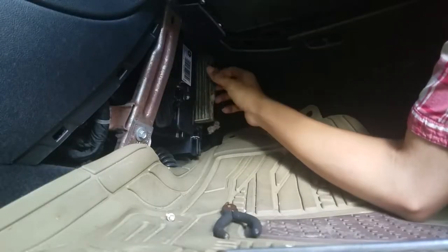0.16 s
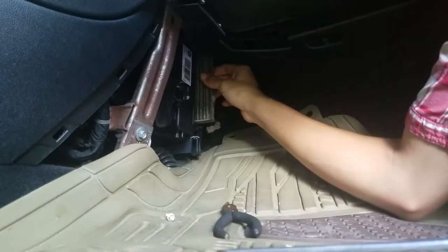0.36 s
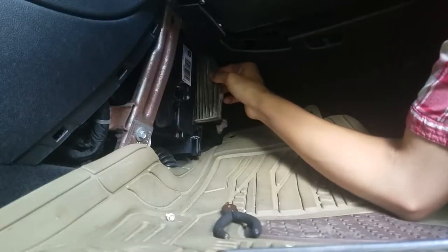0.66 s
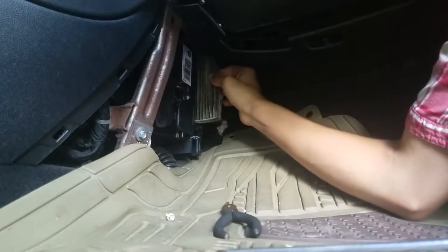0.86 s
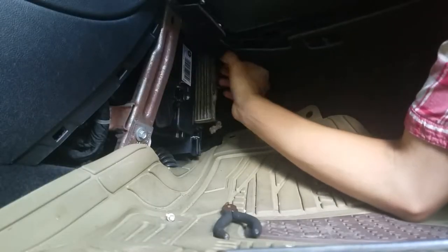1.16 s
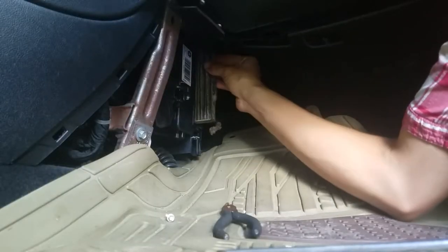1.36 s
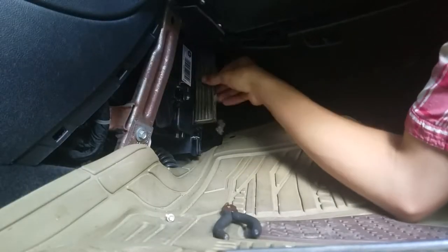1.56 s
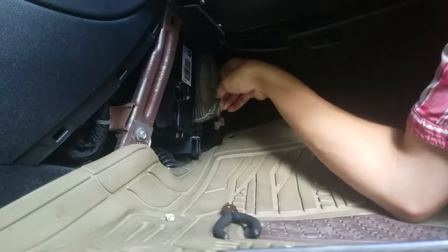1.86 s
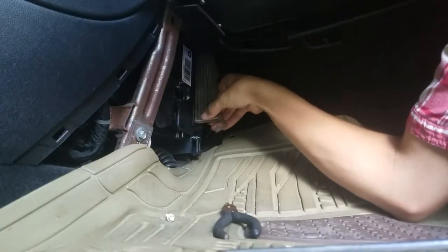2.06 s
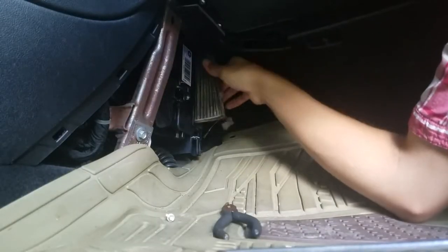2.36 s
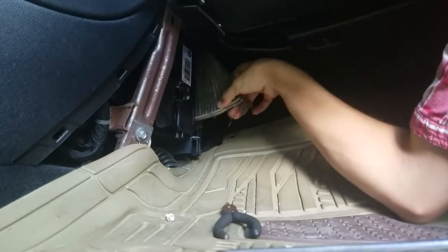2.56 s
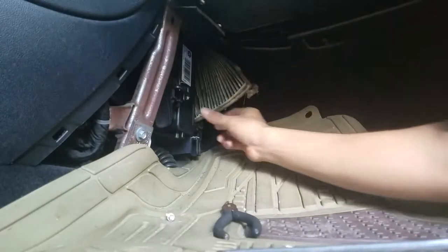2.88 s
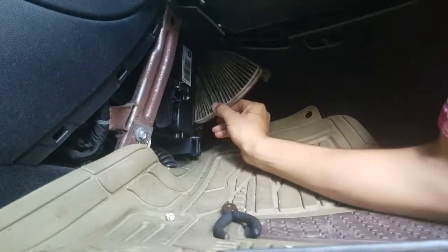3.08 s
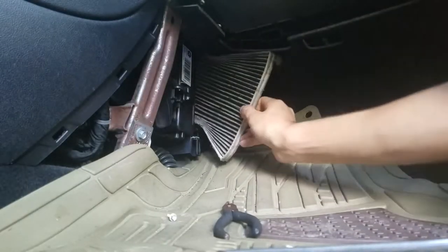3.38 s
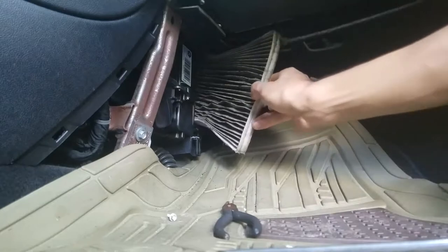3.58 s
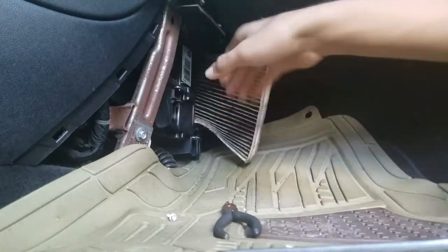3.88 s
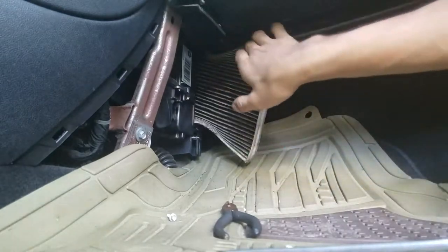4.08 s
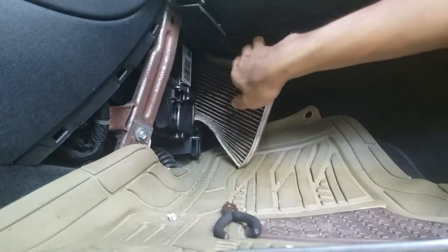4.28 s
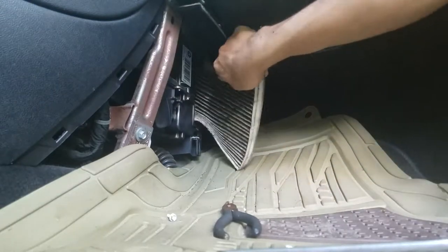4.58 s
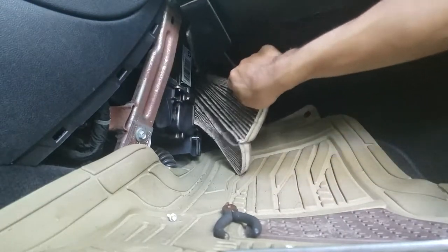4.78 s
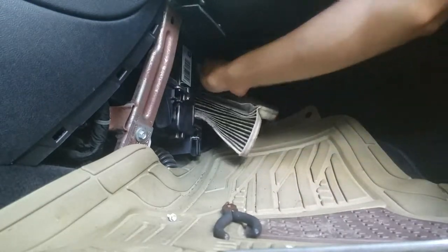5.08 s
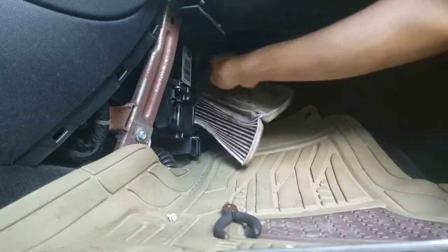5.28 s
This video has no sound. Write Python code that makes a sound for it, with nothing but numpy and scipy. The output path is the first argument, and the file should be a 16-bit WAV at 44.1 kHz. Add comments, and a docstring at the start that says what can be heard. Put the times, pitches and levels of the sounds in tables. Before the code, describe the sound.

A hand works a pleated paper filter out of a plastic slot, with soft knocks, dry crackling snaps and short scrapes, then folding crinkles.

```python
"""Low rumble first, giving way after about a second to a faint hiss; over it a hand works a pleated paper
air filter out of its plastic housing in the footwell of a parked car. Bumps are decaying low sines; snaps are
jerks and fibre slips, scrapes trains of stick-slip catches, both coloured by paper, frame and housing rings.
Faint rubbing, one finger slide and one nail tick fill in; the carpeted footwell adds a very short echo."""
import sys
import numpy as np
from scipy import signal
from scipy.fft import rfft, irfft, next_fast_len
from scipy.io import wavfile

SR = 44100
rng = np.random.default_rng(int(sys.argv[2]) if len(sys.argv) > 2 else 0)


def generate_wav(sig):
    """Save sig (samples, or channels by samples) to the path in sys.argv[1] as 16-bit PCM at SR."""
    pcm = np.round(np.clip(np.atleast_2d(sig).T, -1, 1) * 32767).astype(np.int16)
    wavfile.write(sys.argv[1], SR, pcm)


N = 239842  # samples

# Event levels are before each source's level_db trim, the footwell and the microphones.
# pleat snaps: t/s, level of pleat ring/dB, frame re pleat/dB, crispness/dB
SNAPS = [(0.3445, -61.5, 5.5, 4.5), (0.5791, -51.5, -4, -18), (0.5926, -51.5, -4, -22),
         (0.7546, -49.5, -1, -12), (0.9432, -60, 3, -6), (1.124, -45.5, -16, -9), (1.3318, -35, -16, -8.5),
         (1.516, -46, 7.5, -9.5), (1.7348, -46.5, -10, -3), (1.7437, -43, -6, -11), (1.754, -47, -15, -8),
         (1.9923, -40.5, -7.5, -14.5), (2.0666, -47, -5, 0.5), (2.1826, -39.5, -9.5, -6),
         (2.2055, -42, -2, -13), (2.2722, -36.5, -16, -14), (2.2812, -40, -18, -16),
         (2.2875, -42.5, 1, -7.5), (2.3606, -28, -9.5, -13), (2.3739, -43.5, 7, -3),
         (2.3853, -36, -2.5, -19), (2.5023, -50.5, -3.5, -7.5), (2.6347, -36.5, -7, -13),
         (2.6392, -33, -19, -13), (2.7643, -43.5, -8, -32), (2.8998, -35.5, -2, -24),
         (2.9087, -51.5, 9, -31), (3.074, -43.5, -12, -1), (3.0838, -34.5, 2.5, -10), (3.0946, -34, -1, -5),
         (3.164, -39, -5, -22), (3.1718, -35.5, -5.5, -18.5), (3.2123, -23.5, -4.5, 0),
         (3.2191, -32, -11, -5), (3.2232, -25, -10, -17), (3.3238, -50, 4, 0), (3.4033, -44.5, -5, -2),
         (3.4122, -44.5, 3, -18), (3.473, -35.5, -9.5, -20), (3.529, -40, -12, -21), (3.5397, -44, 1, -15),
         (3.597, -42, -5, -16), (3.605, -39.5, -3, -3.5), (3.6176, -36.5, -0.5, 2.5), (3.6204, -30, 0, -28),
         (3.6738, -39.5, -7, -6.5), (3.6972, -48.5, -2.5, -3), (3.7997, -41.5, -13, -5.5),
         (3.8753, -49.5, -4, -10), (3.9829, -45.5, -12, -7), (4.0441, -52.5, -12, -11),
         (4.3084, -41.5, -17, -6), (4.3622, -47.5, -9.5, -14), (4.4423, -49, 1, -8.5),
         (4.5393, -55.5, 2, -1), (4.6682, -48, -1.5, -11), (4.7279, -53.5, 4.5, -17),
         (4.7485, -46, 1, -2.5), (4.7694, -47, -2, -3), (4.8185, -42.5, -3.5, -1.5),
         (4.8464, -44.5, -12, -6.5), (4.9372, -42.5, -4.5, -8), (4.9885, -44.5, -1.5, -2),
         (5.0907, -43, -7, -13), (5.127, -46.5, -0.5, -4), (5.1539, -44.5, -24, -14),
         (5.1703, -48, -1, -25), (5.19, -46, 0.5, 3.5), (5.1998, -49, 8.5, 1), (5.2643, -57, -2, -5),
         (5.4088, -51, 4, -15), (5.4236, -52, 2.5, -10)]
# paper dragging over plastic: start/s, end/s, crest level/dB, crest re ends/dB, crispness/dB
SCRAPES = [(0.057, 0.093, -82, 6, 14.5), (0.338, 0.382, -69, -7, -20), (0.414, 0.464, -73, -6, -9),
           (0.533, 0.625, -68.5, 0.5, -5), (0.735, 0.771, -66.5, 4, -2.5), (1.025, 1.073, -72.5, 2, -2),
           (1.118, 1.189, -60, 11, -7), (1.25, 1.311, -63.5, 3.5, -7), (1.505, 1.573, -63.5, 0, -2.5),
           (1.711, 1.788, -63.5, 3, -5), (2.105, 2.158, -65, 0, -2.5), (2.173, 2.189, -53, 11, -10),
           (2.188, 2.238, -53, 10, -5), (2.23, 2.28, -63.5, 2, 2), (2.266, 2.296, -47, 13, -10),
           (2.351, 2.397, -50, 2, -5), (2.526, 2.61, -65.5, -2, -3.5), (2.606, 2.663, -42.5, 18.5, -7.5),
           (2.713, 2.842, -53.5, 19, -8), (2.96, 2.968, -52, 5, -7.5), (3.044, 3.117, -35, 22, -11.5),
           (3.175, 3.246, -39, 14.5, -7.5), (3.245, 3.283, -58, -2, -8), (3.315, 3.362, -55, 6, -11),
           (3.397, 3.442, -44.5, -2.5, -13), (3.451, 3.493, -52.5, 7, -6.5), (3.498, 3.555, -44, 3, -9),
           (3.546, 3.589, -54.5, -3.5, -6), (3.593, 3.647, -49, 6, -8), (3.67, 3.751, -57.5, 2, -4.5),
           (3.771, 3.899, -61.5, 3.5, -4.5), (4.008, 4.052, -65, 3.5, -1), (4.136, 4.16, -65, 4, -2.5),
           (4.41, 4.458, -64, 6, -24), (4.648, 4.695, -53.5, 8.5, -9), (4.708, 4.792, -53, 4, -13),
           (4.827, 4.885, -56.5, 11, -4), (4.888, 4.912, -57.5, 1.5, -8.5), (4.918, 5.005, -60, -4, -8.5),
           (5.017, 5.094, -58.5, 4.5, -5), (5.134, 5.217, -50, 7.5, -6.5), (5.254, 5.331, -64, -8.5, -2),
           (5.404, 5.438, -58, 12, -7.5)]
# fingers and frame bumping the housing: t/s, level/dB, f/Hz
KNOCKS = [(0.344, -40, 507), (0.345, -43.5, 296), (0.361, -47, 217), (0.379, -38, 480), (0.434, -39, 450),
          (0.445, -40.5, 480), (0.466, -46.5, 139), (0.554, -40, 312), (0.561, -40, 139),
          (0.565, -37.5, 287), (0.621, -44, 158), (0.744, -44, 480), (0.76, -39.5, 162), (1.06, -52, 154),
          (1.16, -39.5, 710), (1.408, -44.5, 503), (1.526, -40, 532), (1.772, -45.5, 475),
          (2.375, -32, 440), (2.39, -30, 530), (2.656, -37, 495), (3.22, -33.5, 389), (3.225, -40.5, 261),
          (3.735, -46.5, 430), (4.315, -52, 420), (4.448, -59, 483), (5.178, -51, 178), (5.195, -55, 201)]
# light rubbing of hand and paper: t/s, level/dB
RUBBING = [(0.9, -100), (1.25, -73.5), (2.1, -71.5), (2.42, -65.5), (2.8, -63), (3.0, -68.5), (3.36, -68.5),
           (3.52, -48.5), (3.7, -71), (3.97, -87), (4.24, -66), (4.38, -74), (4.55, -61.5), (4.63, -68.5),
           (4.8, -63.5), (5.25, -63.5), (5.43, -66.5)]
# fingers sliding along the frame: t/s, level/dB, f/Hz
FINGER_SLIDE = [(2.64, -66, 1550), (2.688, -66, 1500), (2.73, -55, 1430), (2.771, -50, 1364),
                (2.80, -71, 1345), (2.85, -80, 1360)]
# fingernail tick on the frame, one row: t/s, level/dB, f/Hz, width/Hz, decay/s
NAIL_TICK = (4.3086, -41, 12000, 7000, .0018)
# filter wedged, sliding free, then folded: t/s, pleat f/Hz, push into housing/dB, paper tick re crackle/dB
SEATING = [(0.4, 1510, 8.5, -27), (1.05, 1560, 8, -21), (1.3, 1690, -2, -25), (2.22, 1570, 1.5, -13),
           (2.4, 1680, -1, -20), (2.65, 1620, -0.5, 3), (2.88, 1620, -11.5, -22), (3.09, 1700, -12, -10),
           (3.22, 1610, -4.5, 6.5), (3.45, 1635, -19.5, -15), (3.62, 1740, -5, -0.5), (4.0, 1800, -15, -3),
           (4.33, 1960, 2.5, 8.5), (4.8, 1755, 2.5, -11.5), (5.4, 1730, 0, 1.5)]
# housing, frame, paper crackle, paper tick, fibres; FREED scales the housing row:
# f/Hz, width/Hz, level in snap/dB, level in scrape/dB
RINGS = [ (480, 294, -2.5, 0.5), (1072, 370, -1.5, -4.5), (3830, 2300, -1.5, -1), (7000, 2400, -8.5, -7.5),
         (9700, 8000, -6.5, -6.5), ]
RING_HZ, RING_WIDTH_HZ, RING_SNAP_DB, RING_SCRAPE_DB = np.transpose(RINGS)
# housing ring as the filter leaves the slot: t/s, factor on f, factor on width
FREED = [(3.3, 1.025, 0.94), (4.6, 1.44, 3.45)]
# treble band cancelled by an echo off the nearest panel, one row: f/Hz, width/Hz, depth/dB
PANEL_NOTCH = (4700, 450, 7)
# left-right difference from close panels: f/Hz, side re mid/dB
PANEL_SPREAD = [(100, -18), (600, -18), (1400, -16), (2100, -7), (4000, -6), (8000, -3), (13000, 0)]
# background spectra, relative: f/Hz, density/dB
RUMBLE_SPECTRUM = [(25, -13), (50, -5.5), (70, 1), (100, -9), (150, -4.5), (240, -14), (410, -8.5),
                   (600, -16.5), (1100, -21), (2600, -24), (5000, -29.5), (9600, -37.5), (14000, -33)]
HISS_SPECTRUM = [(25, -6), (70, -6.5), (120, -11.5), (240, -1), (410, -3.5), (650, -10), (1000, -9.5),
                 (1400, -7.5), (2500, -10), (5000, -17), (10000, -20.5), (16000, -24.5)]
# left-right correlation of the background: f/Hz, correlation (0-1)
BACKGROUND_LIKENESS = [(50, 0.99), (500, 0.9), (1500, 0.05), (4000, 0), (15000, 0)]

RUMBLE_DB, HISS_DB, RUMBLE_END_S = -62, -64, 1.12
PLEAT_HZ, PLEAT_WIDTH_HZ = 1700, 447  # above PLEAT_HZ the ring broadens
MEDIAN_CATCH_GAP_S, CATCH_DECAY_S, CATCH_SPREAD_DB = 1 / 160, .0022, 4
STEADY_GRIP = .18  # grip between catches
SCRAPE_CREST = 0.65  # fraction of the stroke
FOLD_START_S, FOLD_END_S, CRINKLES_PER_S = 4.72, 5.34, 10
CRINKLE_DB, CRINKLE_FRAME_DB, CRINKLE_CRISP_DB, CRINKLE_SPREAD_DB = -53.5, -11, -14, 0.5
KNOCK_CYCLES = 15.4  # main swings per 60 dB of decay
RIGHT_RE_LEFT_DB, TOP_HZ = 1.2, 16100


def snaps(level_db=0, jerk=0.47, strain_s=0.0011, crunch_s=0.0021, length_s=0.0026, dulling=0.82, usual_db=-45):
    """A pleat strains, lets go with a jerk, and its fibres crunch for a moment after."""
    out, t = np.zeros((2, N)), np.arange(-384, 512) / SR
    for s, db, frame_db, crisp_db in [*SNAPS, *crinkles()]:
        fibres = slips(len(t), 16000, 3.5)
        crunch = unit(fibres * np.exp(-abs(t) / np.where(t < 0, strain_s, crunch_s)))
        force = crunchiness(s, db) * crunch + jerk * (t == 0)
        pitch_hz, colour_db = contact(s, frame_db, crisp_db, tick_share=1)
        colour_db[-1] -= dulling * max(db - usual_db, 0)  # a big fold is slower to give way
        sound = ring(force, s, pitch_hz, db + level_db, colour_db + RING_SNAP_DB)
        add(out, s + t[0], sound * np.sqrt(length_s * SR))
    return out


def crinkles():
    """Small snaps at uneven moments while the filter is folded, as rows like those of SNAPS."""
    count = int((FOLD_END_S - FOLD_START_S) * CRINKLES_PER_S)
    moments_s = FOLD_START_S + (np.arange(count) + rng.random(count)) / CRINKLES_PER_S
    offsets_db = CRINKLE_SPREAD_DB * np.clip(rng.standard_normal((count, 3)), -2, 2)
    return np.column_stack([moments_s, offsets_db + [CRINKLE_DB, CRINKLE_FRAME_DB, CRINKLE_CRISP_DB]])


def crunchiness(s, db, clean=0.59, ground=1.13, reach_db=13):
    """Fibre crunch against a fixed click: least for a lone snap, more the harder the paper drags then."""
    drags_db = [crest_db for start, end, crest_db, *_ in SCRAPES if start <= s <= end]
    return np.interp(max(drags_db, default=-np.inf) - db, [-reach_db, 0], [clean, ground])


def scrapes(level_db=-1, taper=0.24, frame_db=-0.77, tick_share=0.16):
    """Pleats catch on the edge, each a decaying burst of slips over a steady slide of varying effort."""
    out, t = np.zeros((2, N)), np.arange(N) / SR
    gaps, sizes = rng.standard_normal((2000, 2)).T
    moments_s = np.cumsum(np.exp(.4 * gaps)) * MEDIAN_CATCH_GAP_S
    heights = gain_of(CATCH_SPREAD_DB * np.clip(sizes, -2, 2))
    catches = np.bincount((moments_s * SR).astype(int), heights, N)[:N]
    grip = STEADY_GRIP + signal.lfilter([1], [1, -np.exp(-1 / (CATCH_DECAY_S * SR))], catches)
    friction = grip * slips(N, 7000, 2.58)
    for start, end, db, swell_db, crisp_db in SCRAPES:
        stroke = friction[(t >= start) & (t < end)]
        progress = np.linspace(0, 1, len(stroke))
        effort = gain_of(np.interp(progress, [0, SCRAPE_CREST, 1], [-swell_db, 0, -swell_db]))
        force = stroke * effort * signal.windows.tukey(len(stroke), taper)
        pitch_hz, colour_db = contact((start + end) / 2, frame_db, crisp_db, tick_share)
        sound = ring(force, start, pitch_hz, db + level_db, colour_db + RING_SCRAPE_DB)
        add(out, start, sound * np.linalg.norm(effort))
    return out


def contact(s, frame_db, crisp_db, tick_share):
    """Pleat pitch and ring levels: the frame drives the housing as firmly as the filter sits."""
    when, *columns = np.transpose(SEATING)
    pitch_hz, push_db, tick_db = (np.interp(s, when, column) for column in columns)
    tick = crisp_db + tick_share * tick_db
    return pitch_hz, np.array([frame_db + push_db, frame_db, crisp_db, tick, tick])


def ring(force, s, pitch_hz, db, others_db, panel_s=0.0012):
    """A force excites pleat and other resonances; close panels make the treble differ between sides."""
    size = next_fast_len(len(force) + SR // 30)
    hz, force_spectrum = abs(np.fft.fftfreq(size, 1 / SR)) + 1, np.fft.fft(force, size)
    when, higher, wider = np.transpose(FREED)
    centres_hz, widths_hz = np.append(pitch_hz, RING_HZ), np.append(PLEAT_WIDTH_HZ, RING_WIDTH_HZ)
    widths_hz[0] *= max(pitch_hz / PLEAT_HZ, 1) ** 2  # tighter folds die faster
    centres_hz[1] *= np.interp(s, when, higher)
    widths_hz[1] *= np.interp(s, when, wider)
    notch_hz, notch_width_hz, notch_db = PANEL_NOTCH
    path_power = gain_of(-notch_db / (1 + ((hz - notch_hz) / notch_width_hz) ** 2)) ** 2
    power = 0
    for centre, width, level_db in zip(centres_hz, widths_hz, db + np.append(0, others_db)):
        shape = path_power / (1 + ((hz ** 2 - centre ** 2) / (hz * width)) ** 4)
        power = power + gain_of(level_db) ** 2 * shape / np.mean(shape * abs(force_spectrum) ** 2 + 1e-20)
    # minimum phase: the ringing follows the force
    log_gain = np.log(power + 1e-7 * power.max()) / 2
    mid = force_spectrum * np.exp(signal.hilbert(log_gain).conj())
    panel_t = np.arange(SR // 200) / SR
    panels = unit(rng.standard_normal(len(panel_t)) * np.exp(-panel_t / panel_s))
    side = mid * np.fft.fft(panels, size) * gain_of(read(PANEL_SPREAD, hz))
    return np.fft.ifft([mid + side, mid - side]).real


def slips(size, per_s, spread_db):
    """Tiny stick-slip jerks at random moments: many small, a few large."""
    chance, height, sign = rng.random((size, 3)).T
    strength = gain_of(spread_db * np.minimum(-np.log(height + 1e-9), 4))
    return (chance < per_s / SR) * strength * np.sign(sign - .5)


def knocks(level_db=2, rise_s=0.0021, flex=0.23, flex_ratio=0.64):
    """A soft push swings a wall of the housing for a few cycles, along with a slower flexing."""
    out, t = np.zeros((2, N)), np.arange(SR // 5) / SR
    for s, db, hz in KNOCKS:
        t60_s = KNOCK_CYCLES / hz
        swing = np.sin(2 * np.pi * hz * t) + flex * np.sin(2 * np.pi * hz * flex_ratio * t)
        envelope = (1 - np.exp(-t / rise_s)) * np.exp(-np.log(1000) * t / t60_s)
        add(out, s, swing * envelope * gain_of(db + level_db))
    return out


def finger_slide(width_hz=420):
    """Smooth skin friction sounds one narrow resonance that mostly sinks as the fingers move along."""
    when, db, hz = np.transpose(FINGER_SLIDE)
    t, r = np.arange(N) / SR, np.exp(-np.pi * width_hz / SR)
    noise = rng.standard_normal(N) + 1j * rng.standard_normal(N)
    wobble = signal.lfilter([1], [1, -2 * r, r * r], noise)
    phase = 2 * np.pi * np.cumsum(np.interp(t, when, hz)) / SR
    rub = (wobble * np.exp(1j * phase)).real  # low-passed noise moved up to the pitch
    return rub / rub.std() * gain_of(np.interp(t, when, db)) * (t > when[0]) * (t < when[-1])


def fingernail():
    """A very short, thin tick: decaying band noise, different on each side."""
    s, db, hz, width_hz, decay_s = NAIL_TICK
    out, t = np.zeros((2, N)), np.arange(SR // 50) / SR
    b, a = signal.butter(2, [hz - width_hz / 2, hz + width_hz / 2], "bandpass", fs=SR)
    fizz = signal.lfilter(b, a, rng.standard_normal((2, len(t))))
    add(out, s, gain_of(db) * fizz / fizz.std() * np.exp(-t / decay_s))
    return out


def rubbing(level_db=-2, pitch_hz=1500, push_db=-8, crisp_db=-10):
    """Skin and paper brush with a fine crackle of sparse slips that swells and fades."""
    colour_db = np.array([push_db, 0, crisp_db, crisp_db, crisp_db]) + RING_SCRAPE_DB
    grains = ring(slips(N, 2500, 1.7), 0, pitch_hz, level_db, colour_db)[:, :N] * np.sqrt(N)
    return grains * gain_of(np.interp(np.arange(N) / SR, *np.transpose(RUBBING)))


def footwell(x, echo_db=-12, t60_s=0.038, apart=0.4):
    """The carpeted space throws back a short cluster of echoes, partly different on each side."""
    t = np.arange(SR // 8) / SR
    taps = rng.choice([-1., 1.], (2, len(t))) * (rng.random((2, len(t))) < .1)
    decay = (t > .002) * np.exp(-np.log(1000) * t / t60_s)
    shared, differing = (unit(row * decay) for row in taps)
    tails = np.array([shared + apart * differing, shared - apart * differing])
    return x + gain_of(echo_db) * signal.oaconvolve(x, tails, axes=1)[:, :N]


def background(spectrum, db):
    """Steady shaped noise, alike on both sides in the bass."""
    hz = np.fft.rfftfreq(N, 1 / SR)
    a, b = rfft(rng.standard_normal((2, N)))
    same = read(BACKGROUND_LIKENESS, hz)
    sides = np.array([a, same * a + np.sqrt(1 - same ** 2) * b])
    noise = irfft(sides * gain_of(read(spectrum, hz)), N)
    return gain_of(db) * noise / noise.std()


def gain_of(db):
    """Decibels to an amplitude factor."""
    return 10 ** (np.asarray(db) / 20)


def unit(x):
    """Scales a sound to energy 1."""
    return x / np.sqrt(np.sum(x ** 2) + 1e-20)


def read(points, hz):
    """Interpolates a table on a log-frequency axis."""
    f, value = np.transpose(points)
    return np.interp(np.log(hz + 1), np.log(f + 1), value)


def add(mix, s, sound):
    """Mixes a sound into both channels at time s, cut at the end."""
    part = mix[:, round(s * SR):][:, :sound.shape[-1]]
    part += sound[..., :part.shape[-1]]


def scene():
    """Handling noises in the footwell, over rumble crossfading to hiss."""
    early = np.clip((RUMBLE_END_S - np.arange(N) / SR) / .025 + .5, 0, 1)  # 25 ms crossfade
    rumble = np.sqrt(early) * background(RUMBLE_SPECTRUM, RUMBLE_DB)
    hiss = np.sqrt(1 - early) * background(HISS_SPECTRUM, HISS_DB)
    handling = snaps() + scrapes() + knocks() + finger_slide() + fingernail() + rubbing()
    return footwell(handling) + rumble + hiss


def record(dry, bass_hz=55):
    """The microphones thin the deep bass, the right one a little louder; then the band limit."""
    b, a = signal.butter(1, bass_hz, "highpass", fs=SR)
    heard = signal.lfilter(b, a, dry) * gain_of([[-RIGHT_RE_LEFT_DB / 2], [RIGHT_RE_LEFT_DB / 2]])
    lowpass = signal.firwin(301, TOP_HZ, window=("kaiser", 8), fs=SR)
    return signal.oaconvolve(heard, lowpass[None], "same")


dry = scene()
out = record(dry)
generate_wav(out)
```